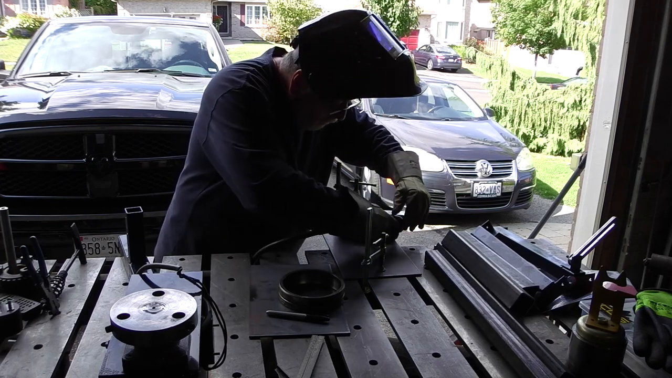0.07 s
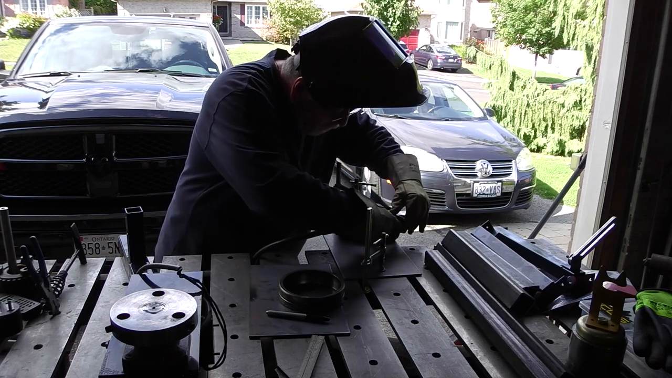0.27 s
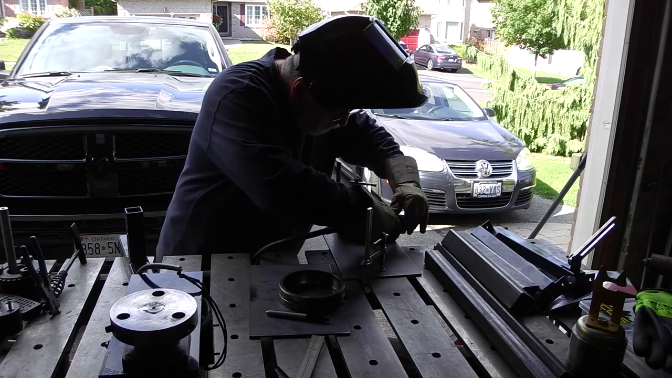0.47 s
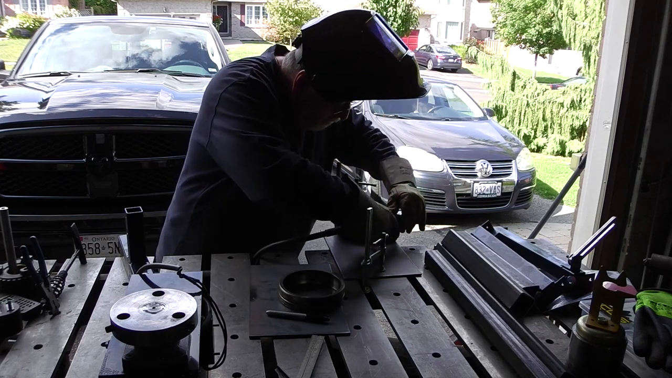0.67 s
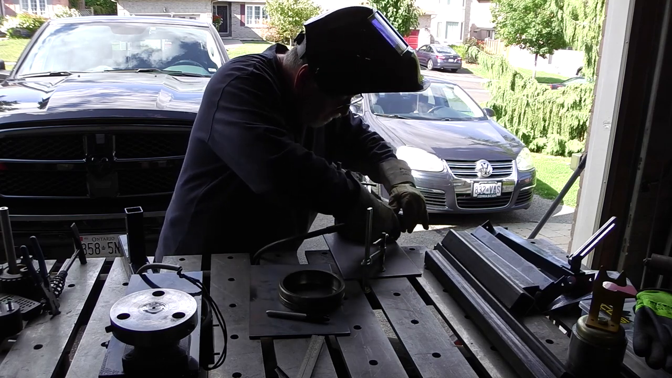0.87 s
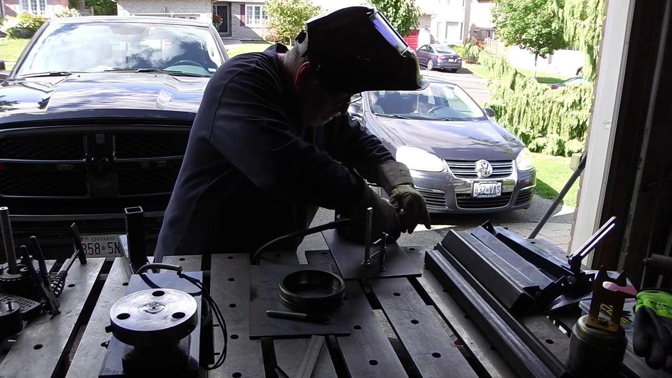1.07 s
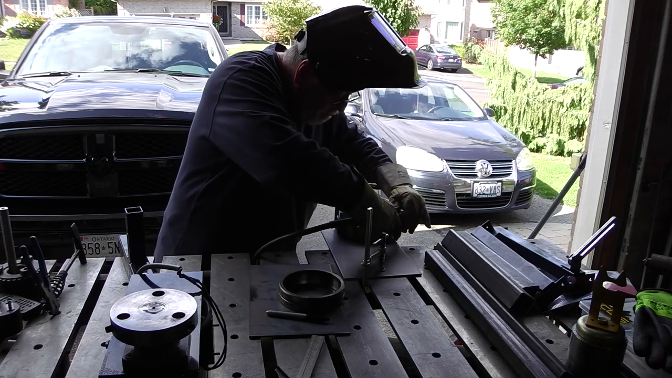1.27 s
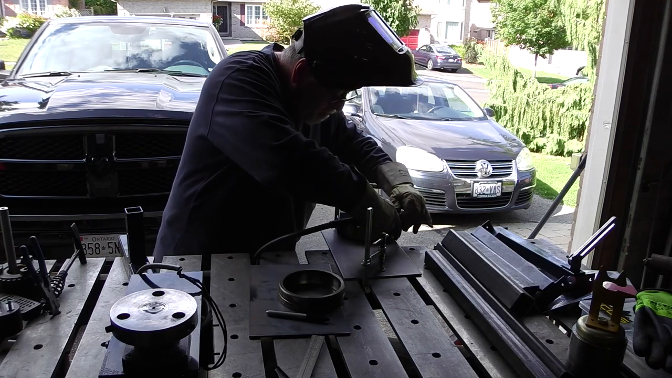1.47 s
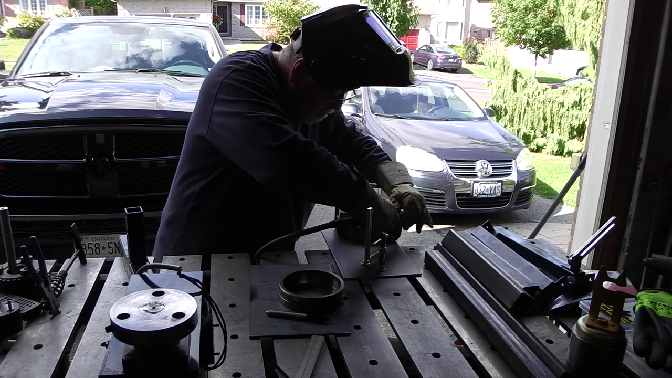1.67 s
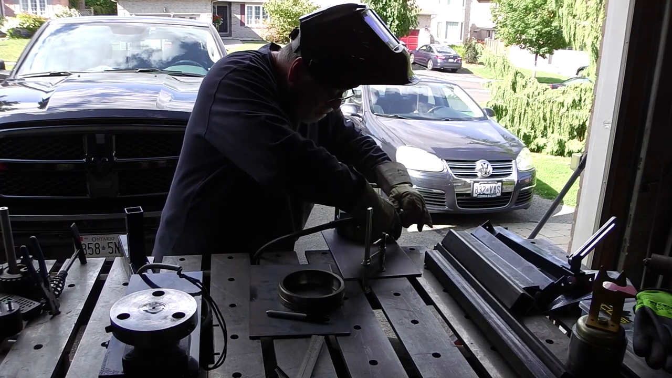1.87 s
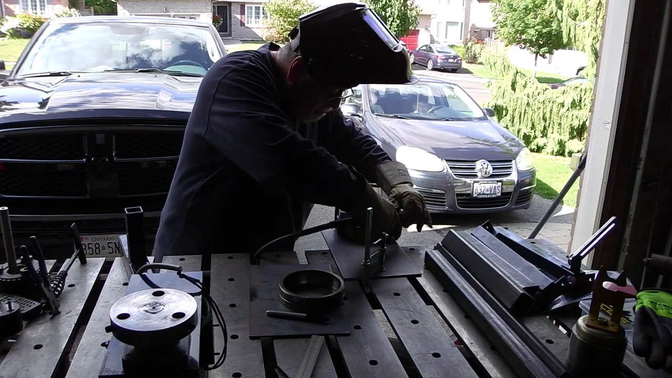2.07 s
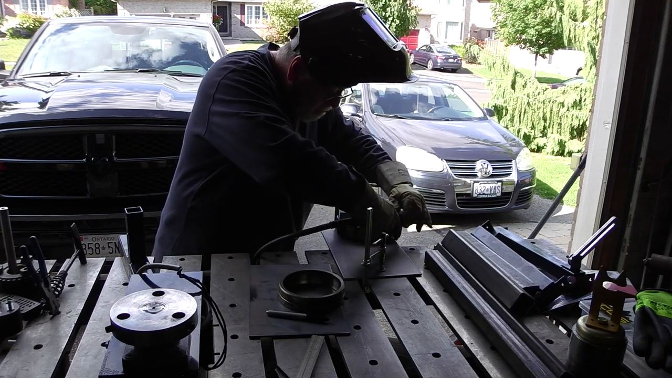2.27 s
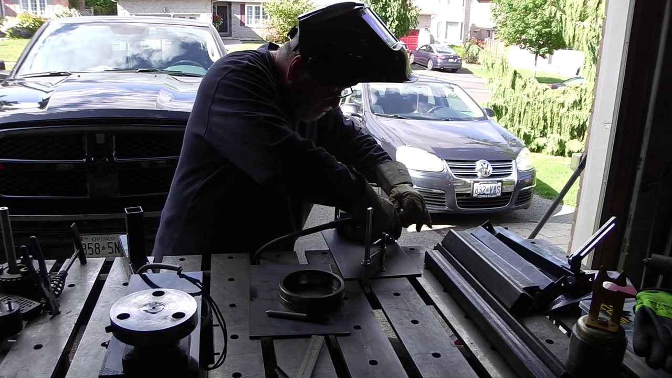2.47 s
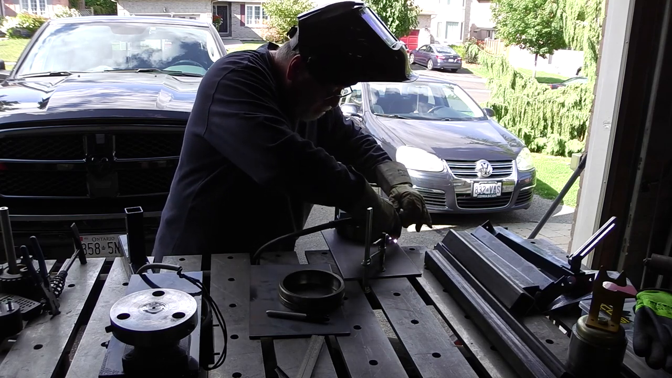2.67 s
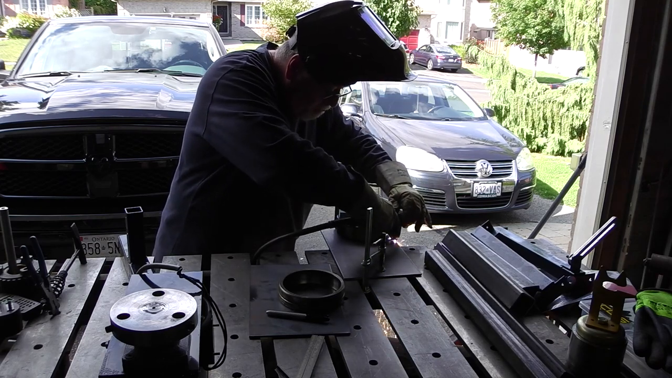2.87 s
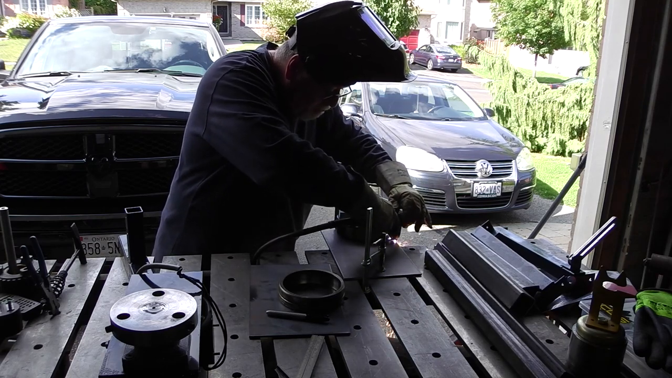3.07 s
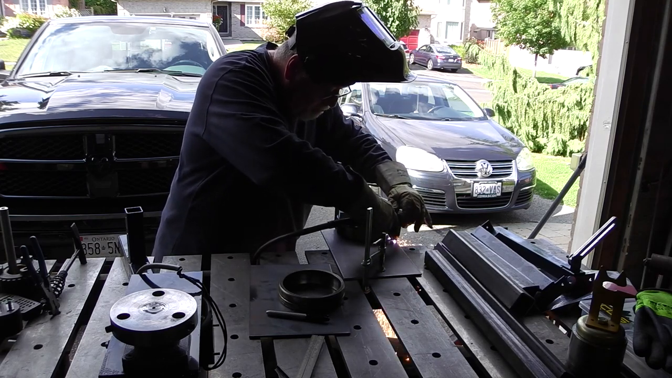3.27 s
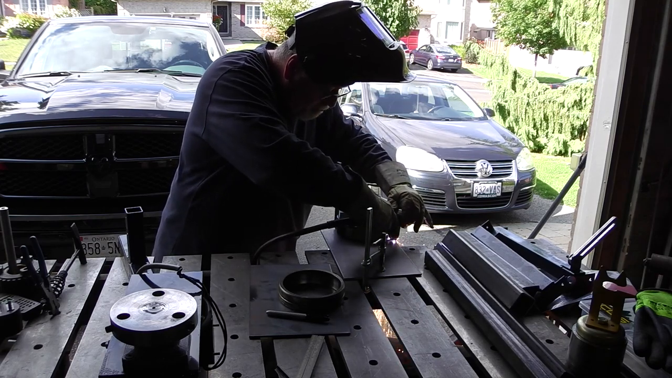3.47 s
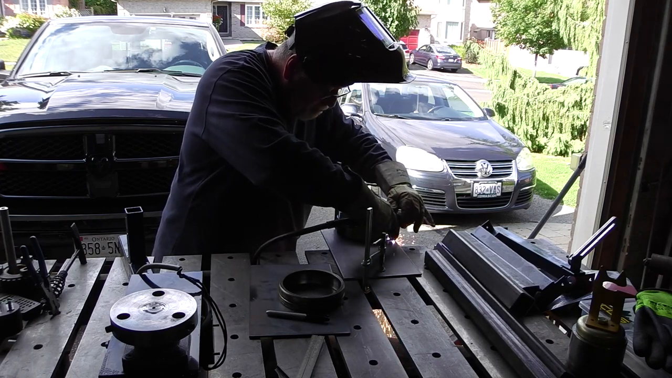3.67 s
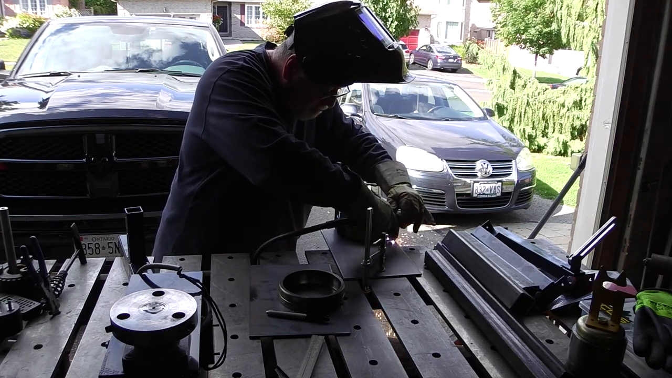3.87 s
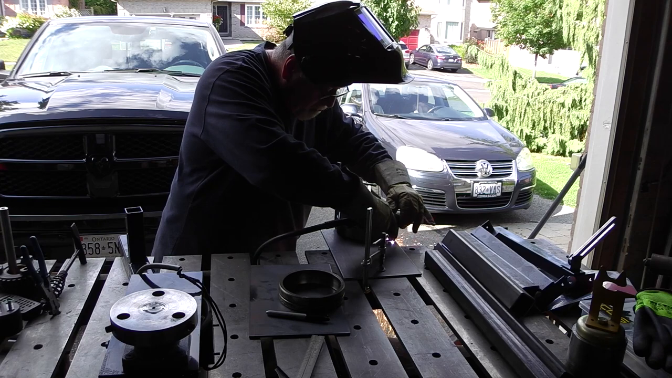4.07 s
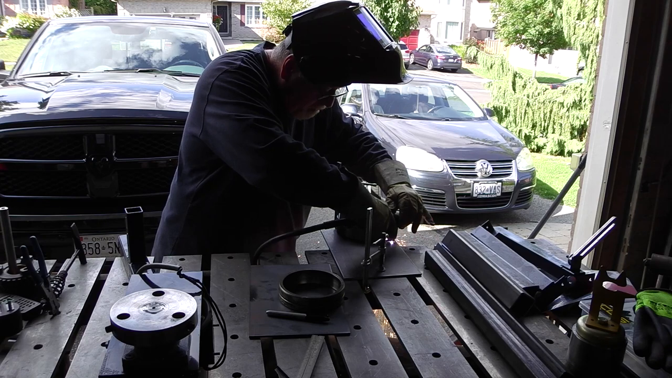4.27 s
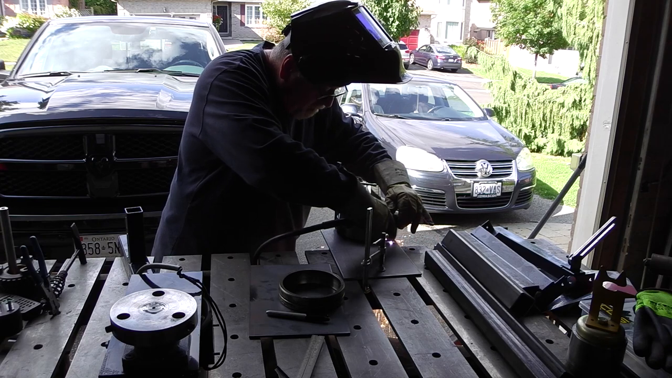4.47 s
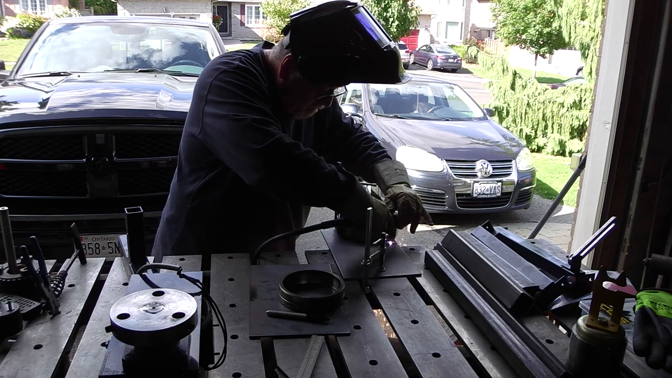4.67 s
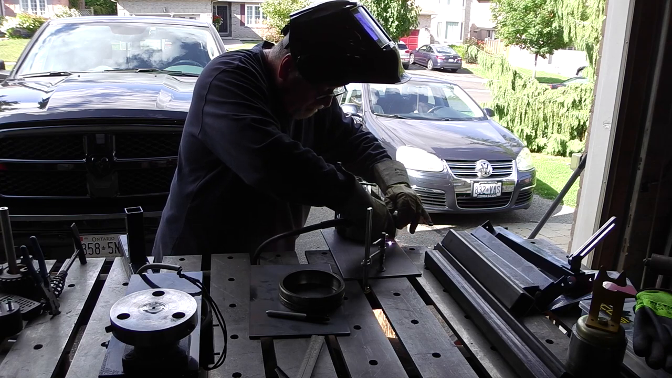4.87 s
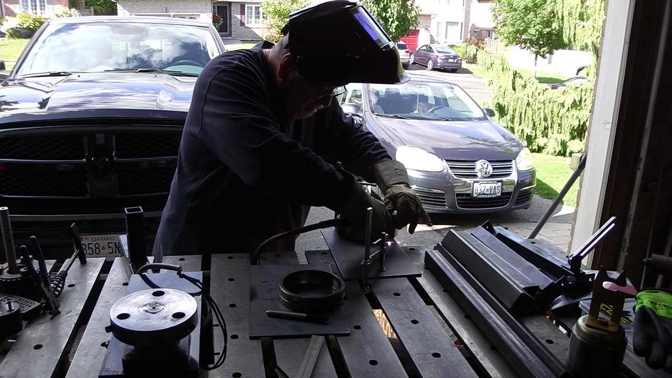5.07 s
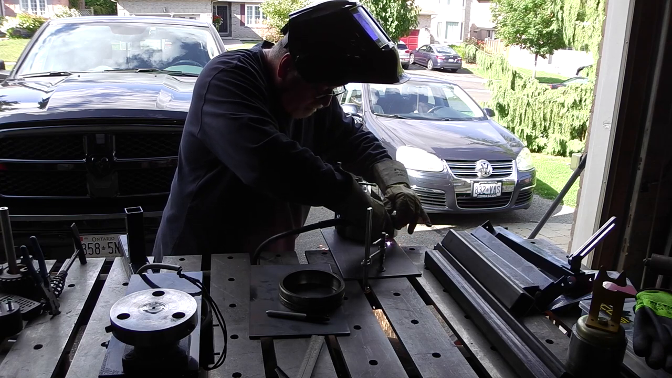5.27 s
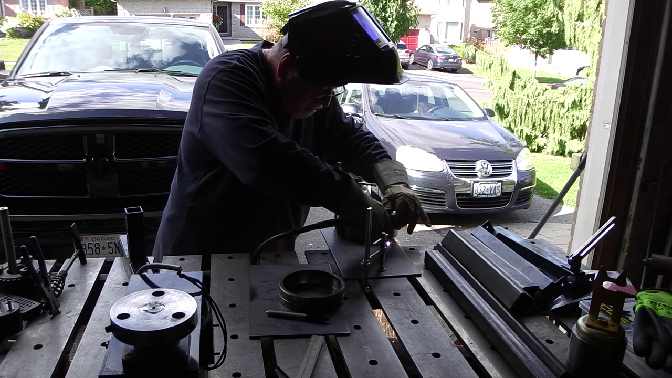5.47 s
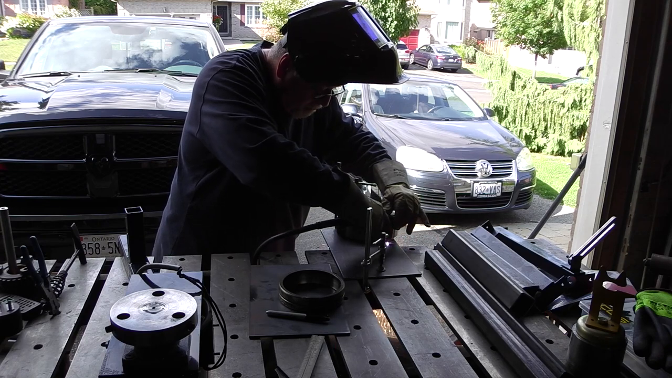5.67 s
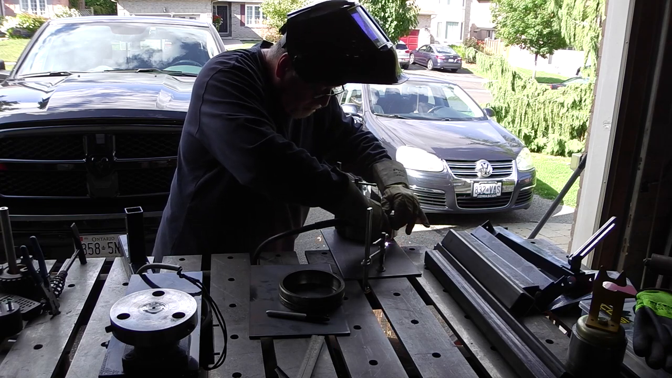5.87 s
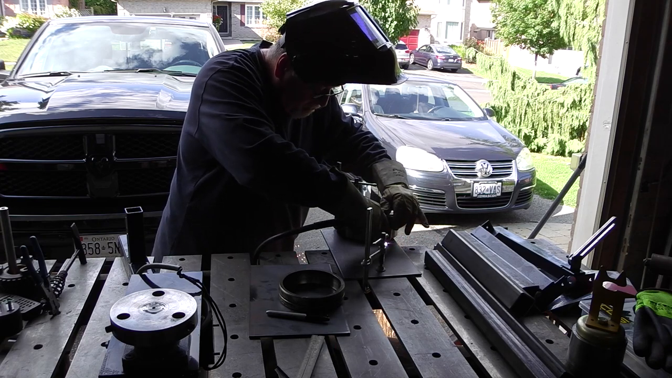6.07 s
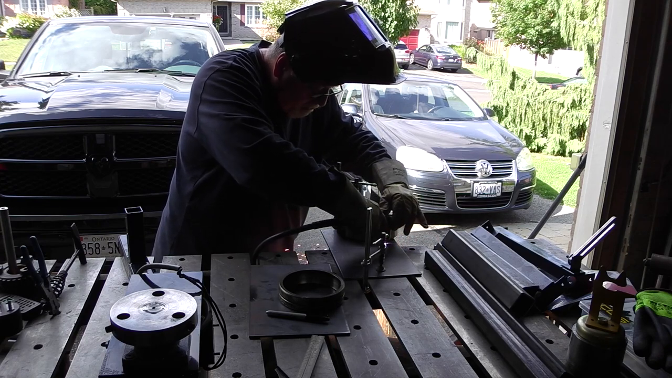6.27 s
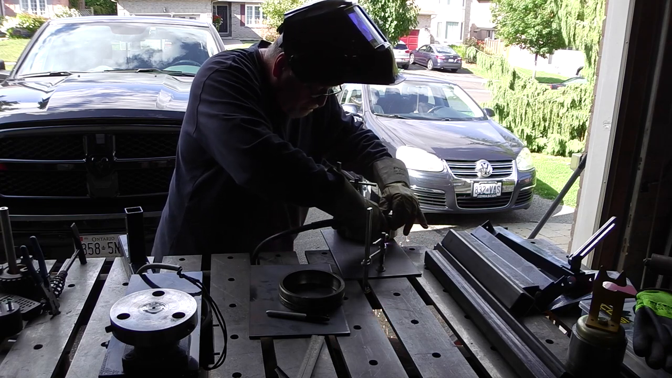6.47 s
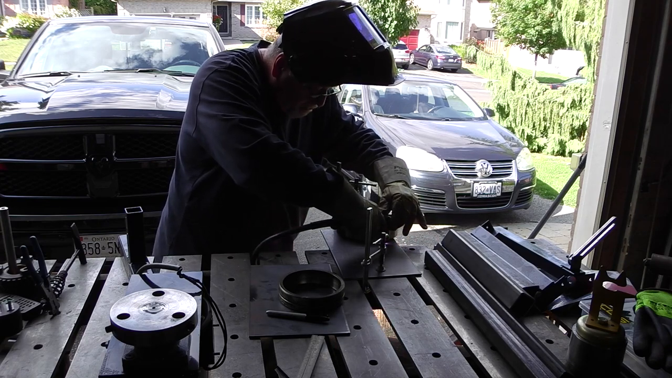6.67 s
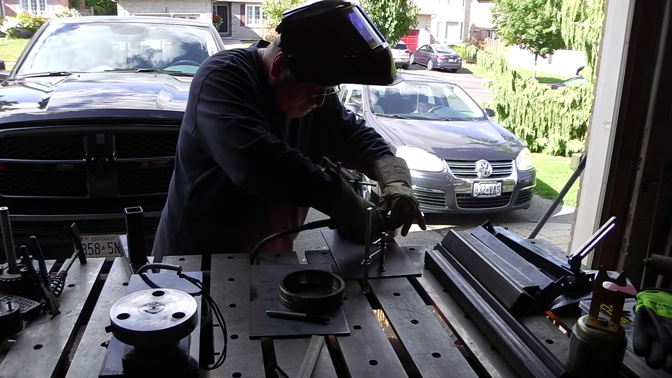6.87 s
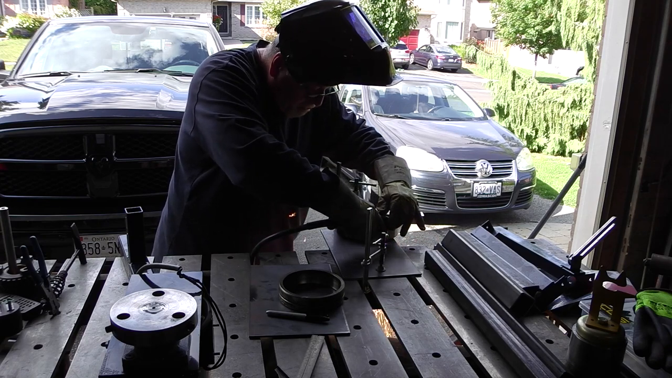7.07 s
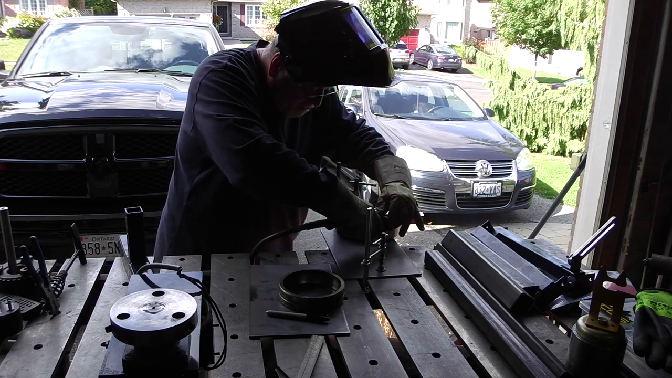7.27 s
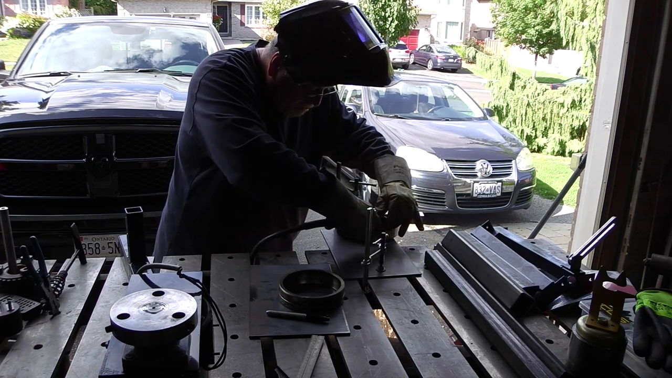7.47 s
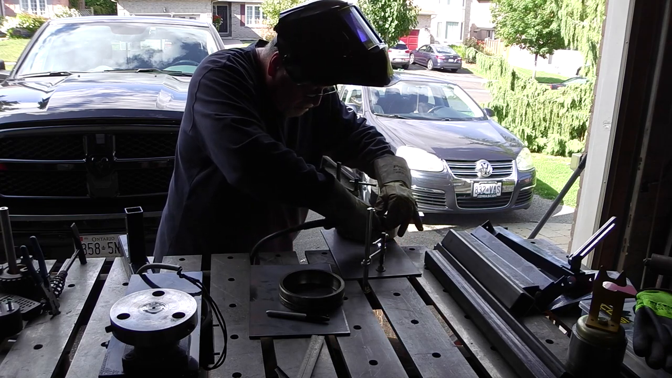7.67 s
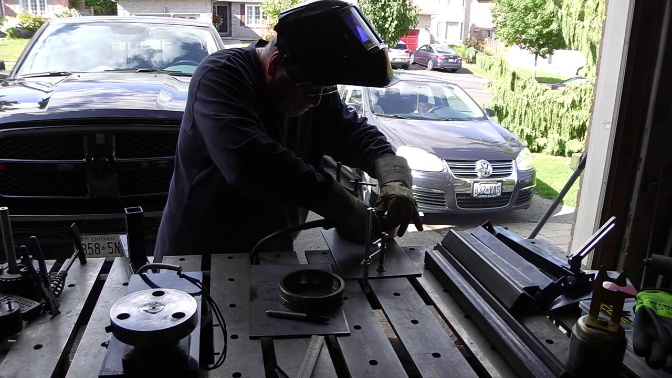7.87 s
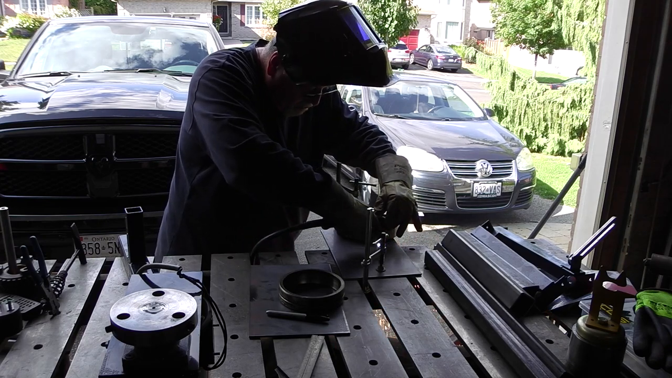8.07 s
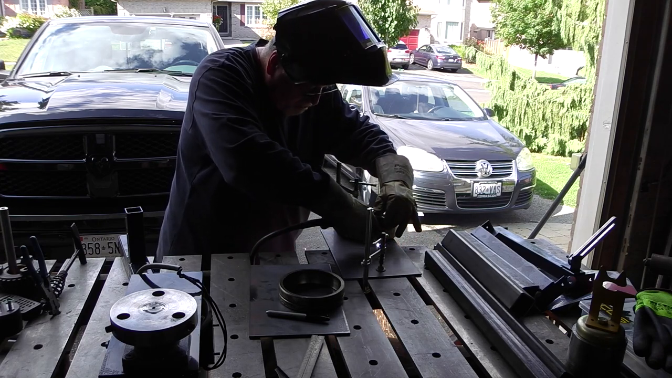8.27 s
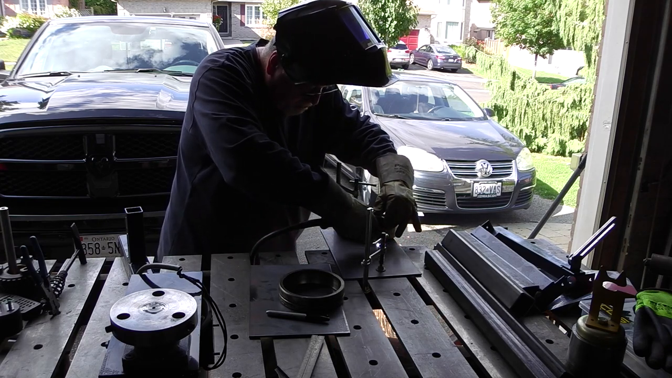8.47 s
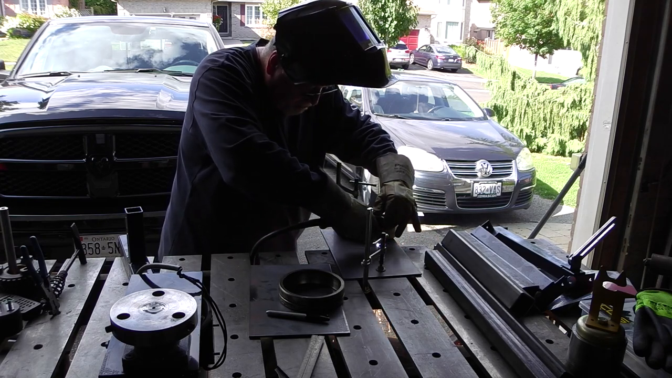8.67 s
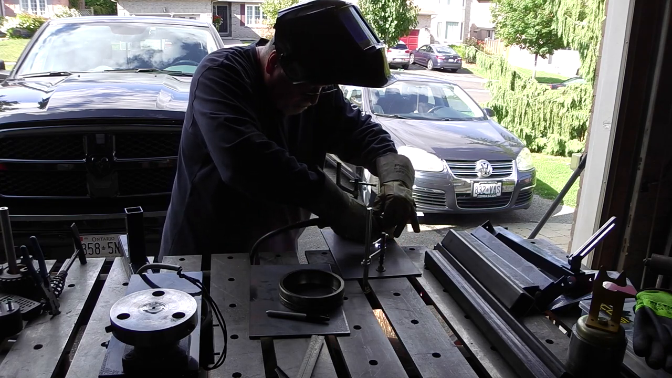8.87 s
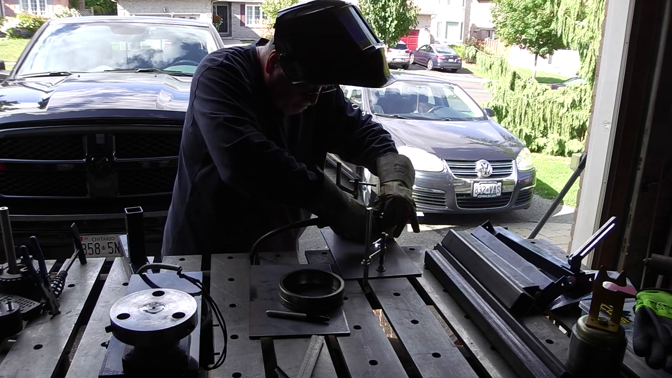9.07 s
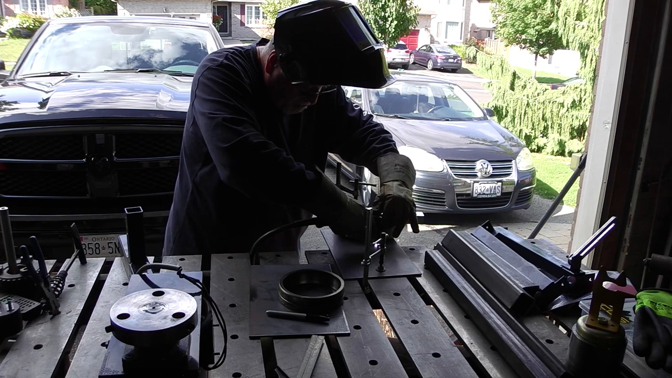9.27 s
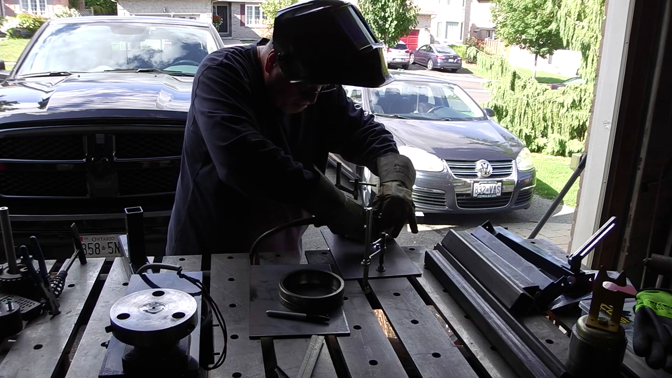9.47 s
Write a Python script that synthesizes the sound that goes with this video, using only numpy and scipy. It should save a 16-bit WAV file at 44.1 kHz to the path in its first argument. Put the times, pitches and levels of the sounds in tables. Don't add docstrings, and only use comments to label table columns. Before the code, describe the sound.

At 0 s struck steel clanks, rattling and fading within about a third of a second over quiet garage air, low machine hum and a far motor that swells and fades. Leaves rustle faintly, a distant bird chirps around 0.4-0.5 s, and tiny high cable ticks continue. At 1.3 s something knocks on the bench and bounces; a light high tick follows near 1.7 s. At 2.25 s air rushes briefly, sharp snaps crack, and the arc strikes around 2.32 s with a short high squeal until 2.43 s. A loud, bright plasma hiss then runs to the end near 9.5 s, strongest at first, settling slightly, with irregular dull slag puffs, crackle and wavering metallic singing. The background sinks as the camera gain drops. Metallic clicks sound around 8.75 s and faintly at 9.3 s. Stereo, a few metres away, short garage echo.

```python
import sys
import numpy as np
from scipy import signal
from scipy.fft import rfft, irfft, next_fast_len
from scipy.io import wavfile
from scipy.ndimage import uniform_filter1d

SR = 44100
rng = np.random.default_rng(int(sys.argv[2]) if len(sys.argv) > 2 else 0)


def voltage_ratio(decibels):
    exponent = np.asarray(decibels, float) / 20
    return 10 ** exponent


def output_pcm(signal):
    pcm = np.clip(np.atleast_2d(signal).T, -1, 1) * 32767
    wavfile.write(sys.argv[1], SR, np.round(pcm).astype(np.int16))


N = 420713
T = np.arange(N) / SR
FRAME_T, BIN_HZ = np.arange(N // 128 + 5) * 128 / SR, np.fft.rfftfreq(512, 1 / SR)

LAYER_HZ = [8000, 3500, 1750, 600, 240, 160]
# (frequency [Hz], level per Hz [dB])
FRESH_JET = [(150, -44), (230, -29), (516, -24), (830, -19), (909, -21), (996, -16.5), (1850, -9.5),
             (2390, -5.5), (2720, -9.5), (3510, -4.5), (4530, -5.5), (5140, -4), (11900, 0), (14800, -1.5),
             (15600, -3)]
# (frequency [Hz], level per Hz [dB])
SETTLED_JET = [(150, -51), (230, -32), (545, -25.5), (587, -24.5), (744, -20.5), (926, -21), (996, -18),
               (1170, -17.5), (1990, -8.5), (2770, -10), (3510, -6), (4290, -6.5), (7010, -4), (13800, 0),
               (15600, -4.5)]
# (time [s], level [dB])
JET_LEVEL = [(2.33, -25), (2.37, -29), (2.53, -26.5), (2.61, -29), (2.65, -26), (2.85, -28), (3.25, -27.5),
             (3.43, -29), (3.69, -28), (4.14, -30), (7.23, -30.5), (7.41, -30), (8.51, -31), (8.84, -29.5),
             (9.24, -30.5), (9.54, -30)]
# (peak time [s], length [s], lift [dB])
BLOWOUTS = [(2.352, 0.033, 18), (2.68, 0.11, 6.5), (3.17, 0.091, 6.5), (3.38, 0.069, 7.5),
            (3.54, 0.035, 11), (3.93, 0.063, 9.5), (4.44, .15, 3), (4.78, 0.044, 4), (5.07, 0.04, 7),
            (5.22, 0.1, 3), (5.37, 0.077, 4), (5.59, 0.063, 10.5), (6.03, 0.18, 3.5), (6.24, 0.15, 7.5),
            (6.67, 0.094, 5.5), (6.77, 0.13, 6), (4.92, .1, -3), (6.95, .1, 3), (7.85, .2, -1.5),
            (7.13, 0.22, 5.5), (7.48, 0.17, 5), (8.1, 0.12, 11.5), (8.52, 0.26, 2.8), (8.78, 0.087, 9),
            (9.12, 0.17, 1), (9.32, 0.24, 8)]
# (peak time [s], length [s], lift [dB])
BITES = [(2.37, 0.062, 0), (2.46, .1, 2), (2.67, 0.047, 1), (2.78, .04, -4), (2.98, .04, 3),
         (3.205, 0.036, -3), (3.8, 0.049, -3), (8.2, .04, 3), (8.62, 0.13, 3.5), (2.87, 0.36, 6),
         (3.16, 0.19, 3.5), (3.48, 0.13, 4), (3.69, 0.12, 3.5), (3.92, 0.041, 2), (4.22, 0.089, 2),
         (4.49, 0.074, 2), (4.73, 0.25, 3), (5.32, 0.12, 6), (5.9, 0.083, 2), (6.47, 0.23, 5),
         (6.74, 0.062, 4), (7.22, 0.091, 1.3), (7.62, 0.056, 2.5), (7.78, 0.21, 4.5), (7.94, 0.055, 3.5),
         (8.09, 0.095, 5), (8.39, 0.15, 4), (8.77, 0.098, 2.5), (9.08, 0.14, 4), (9.34, .14, 4)]
# (peak time [s], length [s], lift [dB])
ROARS = [(2.8, .1, 2.5), (3.2, .1, 0.5), (4.2, 0.24, 0), (4.95, .15, -0.5), (5.3, .15, -1), (5.75, 0.18, 2),
         (6.1, .2, 1.5), (6.55, .2, 1), (6.95, .15, 0), (7.15, .15, 1.5), (7.5, .1, 2), (7.82, .2, 2.5),
         (8.25, .12, -1.5), (8.9, .15, 1), (9.35, .1, 0)]
# (slag, roar, body, fizz [dB per dB])
BLOWOUT_SHARE = [1.16, 0.12, 0.076, -0.033]
# (slag, roar, body, fizz [dB per dB])
BITE_SHARE = [.05, 0.73, 1, 0.068]
# (slag, roar, body, fizz [dB])
FRESH_LIFT = [-4.5, 2, 5, 0.5]
# (slag, roar, body [dB per s])
DRIFT = [-0.02, .5, -0.33]
# (slag, roar, body, fizz [dB])
SPUTTER = [.6, .6, .5, .1]
# (frequency [Hz], width [Hz], early lift [dB], late lift [dB])
RIDGES = [(1880, 88, -3, -1), (2550, 100, 2.5, 1), (2680, 160, -1.5, 0), (3070, 60, -1, 2.5),
          (4100, 110, -3.5, -2), (5330, 130, 1, 0)]
# (peak time [s], length [s], frequency [Hz], slide [Hz per s], lift [dB])
PASSING_RIDGES = [(2.5, 0.7, 13340.0, 148, -4), (2.82, 1.2, 7040, 150, 3.5), (3.15, 1.7, 9360, 0, 4.5),
                  (3.15, 1.3, 12660.0, -150, -8), (3.48, 1.8, 7800, 0, 1.5), (3.48, 0.7, 12200, 100, 5),
                  (3.75, 3.8, 4490.0, 150, -0.5), (3.75, 2.9, 4740, 152, -3.5), (3.75, 3.2, 8640, 6, 4),
                  (4.25, 1.1, 10080.0, 0, 6.1), (4.75, 6.4, 5650.0, -4, -1), (4.75, 4, 11370.0, 0, 0.3),
                  (4.75, 4.5, 15200, -2, -1), (4.78, 1.3, 8700, -300, 0.5), (4.78, 1.6, 10680.0, 0, 2),
                  (5.0, 3.2, 5260, 150, -3.1), (5.1, 1.3, 9500, -150, 3.5), (5.1, 2, 11800.0, -300, 4),
                  (5.3, 0.7, 13470.0, 300, -6), (5.62, 2.5, 12780.0, 0, 3.5), (5.88, 5.4, 5630, 0, -1.5),
                  (6.25, 1.9, 7160, 0, 3), (6.25, 4.3, 10800, 154, 3.5), (6.35, 0.36, 8000, 0, 4),
                  (6.35, 0.7, 13560.0, 150, 1), (6.73, 1.7, 5030, -150, -3), (6.88, 2.5, 9900, 150, 2),
                  (7.0, 4.2, 5850, 0, 3), (7.0, 4.9, 7000, 0, 3.5), (7.05, 1.3, 14720.0, 300, 4),
                  (7.38, 1.3, 12530.0, -150, 0), (7.5, 2.5, 9340.0, -150, 4.5),
                  (7.502, 2.5, 13800, -150, 4.5), (8.12, 1.8, 4420, 148, -5.5),
                  (8.12, 2.5, 14200.0, 150, 1), (8.35, 1.3, 8760, 150, 3), (8.75, 2.1, 6180, 0, 3),
                  (8.8, 0.7, 7450, 0, -3.0), (8.97, 0.7, 13560.0, -150, 3), (9.33, 1.3, 10100, -150, 6)]
# (frequency [Hz], width [Hz], level [dB])
FRESH_SONG = [(2453, 99, -4.5), (3123, 34, -9), (3510, 95, -0.5), (3794, 100, 0.5)]
# (frequency [Hz], width [Hz], level [dB])
SETTLED_SONG = [(1960, 200, -9.5), (2507, 66, -7.5), (3064, 80, -10), (3505, 90, -1), (3620, 100, -6),
                (3810, 110, -3.5)]
# (time [s], level [dB])
AIR_LEVEL = [
    (2.25, -51),
    (2.258, -46),
    (2.265, -42),
    (2.3, -33),
    (2.312, -41.5),
    (2.32, -41),
    (2.33, -50),
]
# (frequency [Hz], level per Hz [dB])
AIR_COLOUR = [(180, -40), (300, -12), (923, -11), (2800, -5), (4230, 0), (5790, -3), (6940, 0), (14800, -5),
              (15600, -14)]
# (time [s], level [dB])
SQUEAL = [
    (2.348, -34),
    (2.375, -30.5),
    (2.388, -29),
    (2.395, -27.5),
    (2.423, -29),
    (2.428, -49),
    (2.45, -58),
]
# (time [s], peak [dB], centre [Hz], width [Hz], time to fall 60 dB [s])
SNAPS = [(.215, -52, 6550, 1500, .04), (1.718, -44, 8750, 1200, 0.15), (1.832, -51, 8000, 5000, .15),
         (2.244, -37, 7000, 6000, .03), (2.263, -22, 10600, 5000, 0.022), (2.266, -42, 2600, 500, .03),
         (2.28, -45, 413, 80, .1), (2.2755, -16.5, 4800, 2200, 0.012), (2.297, -17.5, 2900, 1700, 0.011),
         (2.322, -17, 4700, 1200, 0.032), (2.3235, -18, 5700, 1800, 0.026), (2.327, -25, 5430, 2500, 0.031),
         (2.297, -31, 1200, 1200, .015), (2.35, -22.5, 2000, 740, 0.087), (2.322, -17, 11000, 4900, 0.025),
         (2.343, -22, 2030, 590, 0.12), (2.343, -31, 830, 1300, 0.055), (3.531, -41, 620, 840, 0.064),
         (3.917, -43, 600, 800, 0.2), (5.06, -56, 230, 120, 0.62), (2.63, -53, 240, 130, 0.74),
         (6.22, -61, 330, 110, .4), (8.08, -58, 260, 200, 0.33), (1.3115, -42, 1900, 1600, .02),
         (1.327, -46, 1000, 150, .15), (1.345, -50, 985, 50, .4), (8.746, -38, 3300, 600, .15),
         (8.756, -26.5, 3080, 780, 0.18), (8.779, -34, 3150, 400, 0.22), (8.817, -33, 2880, 900, .1),
         (8.74, -39, 2000, 250, .2), (8.772, -39, 1030, 160, 0.28), (9.31, -34, 2550, 400, 0.33),
         (.088, -40, 1800, 200, .12), (.04, -29, 1600, 900, .05), (1.333, -54, 2750, 300, .05),
         (7.11, -56, 330, 150, .3), (8.93, -55, 260, 200, .06)]
# (time [s], peak [dB])
TICKS = [(.028, -55), (0.2164, -56), (0.3376, -52), (.4172, -62), (.4541, -61.5), (0.5891, -63),
         (0.622, -63), (0.7158, -62), (0.8659, -65), (1.0086, -58), (1.1204, -61), (1.1842, -65),
         (1.2421, -66), (1.2885, -63), (1.3144, -63), (1.4237, -57), (1.4626, -62), (1.517, -65),
         (1.5668, -63), (1.6117, -62), (1.7008, -64), (1.8577, -51), (1.9168, -63), (1.946, -49),
         (2.0021, -66), (2.038, -65), (2.1443, -65), (2.1725, -66)]
# (frequency [Hz], level [dB], time to fall 60 dB [s])
CLANK_TONES = [(353, -17.5, .2), (568, -3, 0.27), (685, -6.5, 0.21), (904, 0, 0.088), (1180, -6, 0.13),
               (1440, -4, .15), (1674, -14, .2), (1795, 1, 0.24), (2150, 1.5, .09), (2420, -13, 0.18),
               (2700, -4, 0.12), (2970, -7, .07), (3250, -5, 0.16), (3628, -13, 0.23)]
# (frequency [Hz], level per Hz [dB])
CLANK_COLOUR = [(180, -42), (300, -7), (474, -16), (541, 4), (616, -9), (913, -3), (1020, -7), (1150, -0.5),
                (1820, 1), (1970, -7), (3330, -7), (5350, -21), (15000, -50)]
# (frequency [Hz], level [dB], time to fall 60 dB [s])
KNOCK_TONES = [(650, 0, 0.11), (983, 1, .45), (1160, -1, .12), (1346, 0, .08), (1560, -3, .05),
               (1863, -1, .05), (2400, -1, .04), (2720, -8, .15), (3260, -5, .05), (3720, -10, .03)]
# (frequency [Hz], level per Hz [dB])
KNOCK_COLOUR = [(400, -18), (650, 6), (1800, 2), (3500, -13), (5000, -29.5)]
# (frequency [Hz], time to fall 60 dB [s])
WALLS = [(200, 0.55), (1000, 0.42), (4000, 0.36), (14000, 0.41)]
# (frequency [Hz], level [dB])
ECHO_WIDTH = [(60, -21), (200, -12), (380, -11), (700, -13), (1290, -14), (2380, -17.5), (4400, -7),
              (8120, -6.5), (15000, -5)]
# (frequency [Hz], level [dB])
SHOP_WIDTH = [(60, -17), (110, -14), (200, -14), (380, -13), (700, -15), (1290, -15), (2380, -11),
              (4400, -6), (8120, -3), (15000, -1)]
# (time [s], gain [dB])
CAMERA_GAIN = [
    (2.26, -13),
    (2.34, -22),
    (2.5, -29),
    (3, -30.5),
    (4, -33),
    (5, -37),
    (6.4, -36.5),
    (6.52, -46),
    (6.62, -37),
    (9.5, -36),
]
# (frequency [Hz], level per Hz [dB])
SHOP_COLOUR = [(15, -43), (25, -49), (59, -5), (136, -7), (240, -13.5), (332, -10.5), (400, -14.5),
               (705, -14.5), (1060, -16.5), (1210, -17), (1710, -20), (3270, -23), (4170, -27.5),
               (11900, -37.5), (15600, -45)]
# (frequency [Hz], width [Hz], level [dB])
HUM = [(77, 25, -60), (114.2, 5.8, -54), (175.3, 2.2, -56.5), (352, 8, -59), (1250, 29, -59)]
# (time [s], tone level [dB], shaft level [dB])
MOTOR = [(0, -66, -64), (.1, -58, -56), (.2, -63, -54), (.3, -66, -57), (.4, -55, -60), (.6, -62, -54),
         (.8, -56, -57), (.95, -59, -56), (1.1, -52, -59), (1.25, -66, -61), (1.42, -70, -66),
         (1.52, -56, -68), (1.63, -64, -52), (1.74, -66, -57), (1.82, -52, -58), (1.98, -61, -59),
         (2.2, -52, -61), (2.3, -64, -62)]
# (time [s], level [dB])
LEAVES_LEVEL = [
    (0, -58),
    (.12, -56),
    (.28, -59),
    (.4, -51.5),
    (.7, -55),
    (1.2, -61),
    (1.7, -80),
]
# (frequency [Hz], level per Hz [dB])
LEAVES_COLOUR = [(2000, -24), (4500, -2), (6500, -1), (9000, -7), (15000, -15)]
# (time [s], level [dB])
CHIRP_LEVEL = [
    (.32, -83),
    (.35, -62),
    (.42, -68),
    (.48, -55),
    (.54, -78),
]
# (frequency [Hz], width [Hz], level [dB])
CHIRP_TONES = [(8500, 300, -2), (8850, 250, 0)]
# (frequency [Hz], left over right [dB])
MIC_LEAN = [(60, -.6), (200, -1), (700, -1), (1290, -.6), (2380, -.2), (4400, -1.3), (8120, -.9),
            (15000, -1.8)]
# (frequency [Hz], level [dB])
TREBLE_END = [(15690, 0), (15760, -70)]


def evened(x):
    return x / np.sqrt(np.mean(x ** 2) + 1e-20)


def read(points, hz):
    f, value = np.transpose(points)
    return np.interp(np.log(hz + 1), np.log(f + 1), value)


def played(rows):
    s, db = np.transpose(rows)
    return voltage_ratio(np.interp(T, s, db)) * (T >= s[0]) * (T <= s[-1])


def colour(x, points):
    size = next_fast_len(x.shape[-1])
    gain = voltage_ratio(read(points, np.fft.rfftfreq(size, 1 / SR)))
    return irfft(rfft(x, size) * gain, size)[..., :x.shape[-1]]


def coloured_noise(points):
    return evened(colour(rng.standard_normal(N), points))


def resonate(x, hz, width):
    turn = np.exp(2j * np.pi * hz * np.arange(len(x)) / SR)
    r = np.exp(-np.pi * width / SR)
    return 2 * (turn * signal.lfilter([1 - r], [1, -r], x / turn)).real


def fuzzy_lines(modes):
    out = np.zeros(N)
    for hz, width, db in modes:
        once = resonate(rng.standard_normal(N), hz, width)
        out += voltage_ratio(db) * evened(resonate(once, hz, width))
    return out


def add(mix, s, sound):
    part = mix[round(s * SR):][:len(sound)]
    part += sound[:len(part)]


def lift(rows, t):
    return sum(db * np.exp(-np.log(16) * ((t - s) / length) ** 2) for s, length, db in rows)


def wander(t, count, span_s):
    step_s = .005
    steps = np.arange(0, t[-1] + 1, step_s)
    size = max(round(span_s / step_s), 1)
    rows = uniform_filter1d(rng.standard_normal((len(steps), count)), size, axis=0)
    rows = uniform_filter1d(rows, size, axis=0)
    return np.array([np.interp(t, steps, evened(row)) for row in rows.T])


def jet(patchy_db=0.88, flicker_db=0.28):
    corners_hz = np.log(LAYER_HZ[::-1])
    layers_db = [np.interp(np.log(BIN_HZ + 1), corners_hz, [0, row[0], *row]) for row in kerf_db().T]
    tilt_db = np.array(layers_db).T
    a, b, patches = rng.standard_normal((len(FRAME_T), 257, 3)).T
    patches = evened(uniform_filter1d(uniform_filter1d(patches, size=9, axis=0), size=16, axis=1))
    flicker = evened(uniform_filter1d(rng.standard_normal(len(FRAME_T)), size=8))
    hiss = (a + 1j * b) * voltage_ratio(tilt_db + passing_db() + patchy_db * patches + flicker_db * flicker)
    raw = signal.istft(hiss, nperseg=512, noverlap=384)[1][:N]
    spark_size = voltage_ratio(7.7 * np.minimum(rng.exponential(1, N), 3))
    sparks = spark_size * (rng.random(N) < 1500 / SR)
    raw = evened(raw) + voltage_ratio(-12.0) * evened(sparks * rng.choice([-1., 1.], N))
    early = evened(ridged(colour(raw, FRESH_JET), column=2))
    late = evened(ridged(colour(raw, SETTLED_JET), column=3))
    settled = np.clip((T - 3.6) / 1.63, 0, 1)
    lit = np.clip((T - 2.3195) / 0.0027, 0, 1)
    level = voltage_ratio(0.81 + np.interp(T, *np.transpose(JET_LEVEL)))
    return evened((1 - settled) * early + settled * late) * level * lit


def kerf_db(through_s=2.335, rise_s=0.0096, shut_db=-51, settle_s=0.36):
    age = np.maximum(FRAME_T - through_s, 0)
    layers = np.outer(BLOWOUT_SHARE, lift(BLOWOUTS, FRAME_T))
    layers += np.outer(BITE_SHARE, lift(BITES, FRAME_T))
    layers += np.outer(FRESH_LIFT, np.exp(-age / settle_s))
    layers += np.outer([*DRIFT, 0], FRAME_T - FRAME_T.mean())
    layers += np.c_[SPUTTER] * wander(FRAME_T, count=4, span_s=.045)
    layers[1] += lift(ROARS, FRAME_T)
    layers[:2] += shut_db * np.clip(1 - age / rise_s, 0, 1)
    return layers - np.median(layers, axis=1, keepdims=True)


def passing_db(width_hz=300, depth=.95):
    total = 0
    for s, length, hz, slide, db in PASSING_RIDGES:
        offset_hz = BIN_HZ[:, None] - hz - slide * (FRAME_T - s)
        total = total + lift([(s, length, db)], FRAME_T) / (1 + (2 * offset_hz / width_hz) ** 2)
    return depth * total


def ridged(x, column):
    size = next_fast_len(N)
    f = np.fft.rfftfreq(size, 1 / SR)
    boost_db = sum(row[column] / (1 + (2 * (f - row[0]) / row[1]) ** 2) for row in RIDGES)
    return irfft(rfft(x, size) * voltage_ratio(boost_db), size)[:N]


def song():
    db = -50.5 + .55 * lift(BITES, T) + 1.2 * wander(T, count=1, span_s=.04)[0]
    fresh = np.clip((3.81 - T) / 0.09, 0, 1)
    started = np.clip((T - 2.5) / 0.092, 0, 1)
    early = voltage_ratio(5.5) * evened(fuzzy_lines(FRESH_SONG))
    late = evened(fuzzy_lines(SETTLED_SONG))
    return voltage_ratio(db) * started * (fresh * early + (1 - fresh) * late)


def preflow():
    return played(AIR_LEVEL) * coloured_noise(AIR_COLOUR)


def squeal():
    tone = 1.17 * np.sin(2 * np.pi * 3792 * T)
    return played(SQUEAL) * (tone + fuzzy_lines([(3740, 500, -2.5)]))


def snaps():
    out, t = np.zeros(N), np.arange(8000) / SR
    ticks = [(s, db + 2.5, 11900, 1000, .06) for s, db in TICKS]
    rows = SNAPS + ticks
    for (s, db, hz, width, t60), noise in zip(rows, rng.standard_normal((len(rows), 8000))):
        click = 2 * np.sqrt(SR / width) * (t == 0)
        ring = (noise + click) * voltage_ratio(-60 * t / t60)
        for _ in range(3):
            ring = resonate(ring, hz, width * 1.24)
        add(out, s, voltage_ratio(db) * ring / abs(ring).max())
    return colour(out, [(110, -23), (220, -0.5)])


def clank():
    blows = [(0, -35.5), (.0025, -37), (.012, -44), (.024, -50), (.042, -48)]  # (time [s], level [dB])
    ringing = struck(CLANK_TONES, blows, spread=0.018, longest=.3)
    return clatter(0, -31.5, 0.28, CLANK_COLOUR) + ringing


def knock(knock_s=1.3115, bounce_s=1.327):
    ringing = struck(KNOCK_TONES, [(knock_s, -56), (bounce_s, -60)], spread=0.004, longest=.5)
    return clatter(knock_s, -49, .1, KNOCK_COLOUR) + ringing


def struck(modes, blows, spread, longest):
    out, t = np.zeros(N), np.arange(SR // 2) / SR
    for k, (hz, db, t60) in enumerate(modes):
        detune = 1 + spread * rng.uniform(0.31, 1, (2, 1)) * [[-1], [1]]
        low, high = 2 * np.pi * hz * t * detune
        ring = 1.13 * np.sin(2 * np.pi * hz * t) + 0.34 * (np.sin(low) + np.sin(high))
        ring = ring * (-1) ** k * np.minimum(t / .0005, 1)
        for s, blow_db in blows:
            add(out, s, voltage_ratio(blow_db + db - 60 * t / min(t60, longest)) * ring)
    return out


def clatter(s, db, t60, points):
    out, t = np.zeros(N), np.arange(SR // 2) / SR
    add(out, s, voltage_ratio(db - 60 * t / t60) * evened(colour(rng.standard_normal(len(t)), points)))
    return out


def garage(x, hold_s=1.28):
    out, hop = np.zeros(N), int(hold_s * SR)
    for start in range(-hop, N, hop):
        a, b = max(start, 0), min(start + 2 * hop, N)
        fade = np.sin(np.pi * (np.arange(a, b) - start) / (2 * hop))
        add(out, a / SR, signal.fftconvolve(x[a:b] * fade, tail()))
    return out


def tail():
    taps, at = np.zeros(SR // 2), np.arange(100, SR // 2 - 10, 10)
    taps[at + rng.integers(0, 10, len(at))] = rng.choice([-1., 1.], len(at))
    hz, t, z = signal.stft(taps, SR, nperseg=256)
    decay_db = -60 * t / read(WALLS, hz)[:, None]
    first_db = 13.0 * np.exp(-t / 0.0045)
    echo = signal.istft(z * voltage_ratio(decay_db + first_db), SR, nperseg=256)[1]
    return echo / np.linalg.norm(echo)


def motor():
    s, tone_db, shaft_db = np.transpose(MOTOR)
    throb = wander(T, count=1, span_s=.12)[0]
    turns = 74.2 * T + 0.077 * throb
    shaft = voltage_ratio(np.interp(T, s, shaft_db + 12.5, right=-52) + 4 * throb * (T > s[-1]))
    tone = voltage_ratio(np.interp(T, s, tone_db + 12.5, right=-70))
    return np.sqrt(2) * (tone * np.sin(4 * np.pi * turns) + shaft * np.sin(2 * np.pi * turns))


def leaves():
    return played(LEAVES_LEVEL) * coloured_noise(LEAVES_COLOUR)


def bird():
    return played(CHIRP_LEVEL) * evened(fuzzy_lines(CHIRP_TONES))


def shop(level_db=-46.5):
    return voltage_ratio(level_db + 5.0) * evened(colour(rng.standard_normal((2, N)), SHOP_COLOUR))


def scene():
    flow = jet() + song() + preflow()
    hits = snaps() + squeal() + clank() + knock()
    echoed = flow + voltage_ratio(-3.0) * hits
    mid = flow + hits + voltage_ratio(-5.0) * garage(echoed)
    side = colour(garage(echoed), ECHO_WIDTH)
    air, other = shop()
    background = air + leaves() + motor() + fuzzy_lines(HUM) + bird()
    ducked = voltage_ratio(np.interp(T, *np.transpose(CAMERA_GAIN)))
    mid = mid + ducked * background
    side = side + ducked * colour(other, SHOP_WIDTH)
    return np.array([mid + side, mid - side])


def roll_off(x):
    return signal.sosfilt(signal.butter(12, 15740, fs=SR, output="sos"), x)


def record(dry):
    lean = [[(hz, sign * db / 2) for hz, db in MIC_LEAN] for sign in (1, -1)]
    mix = np.array([colour(colour(x, points), TREBLE_END) for x, points in zip(dry, lean)])
    return roll_off(mix)


dry = scene()
out = record(dry)
output_pcm(out)
```